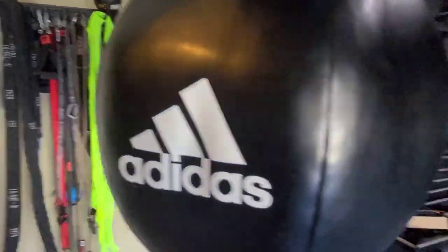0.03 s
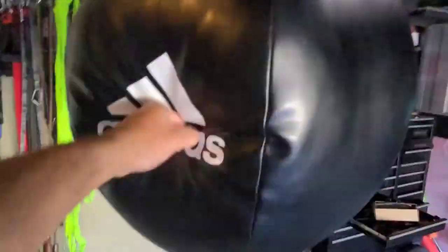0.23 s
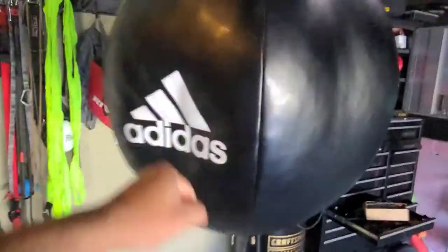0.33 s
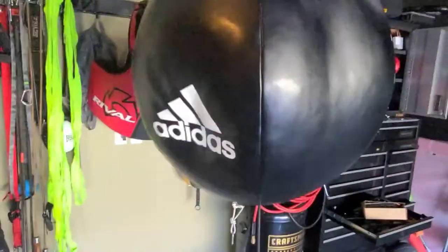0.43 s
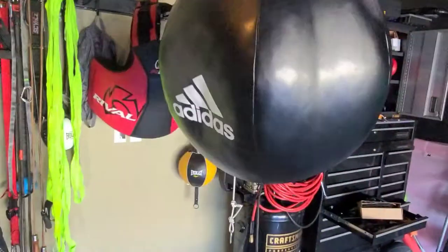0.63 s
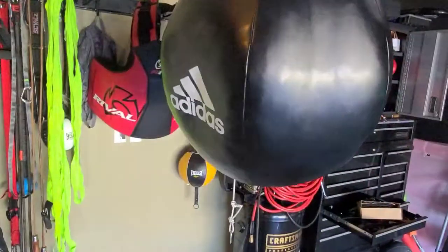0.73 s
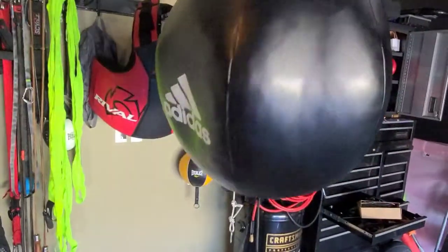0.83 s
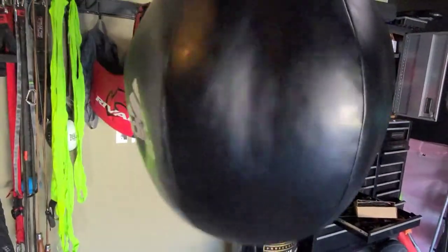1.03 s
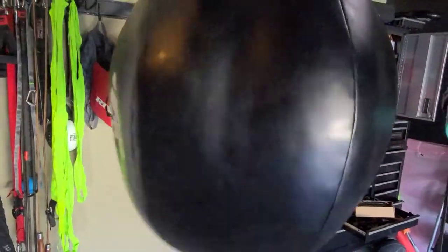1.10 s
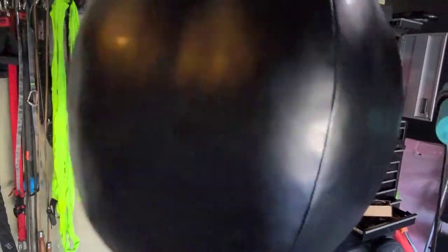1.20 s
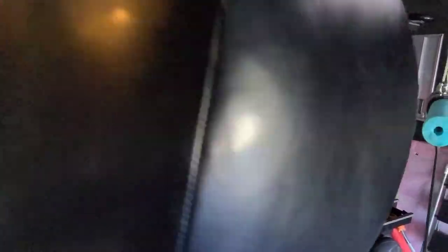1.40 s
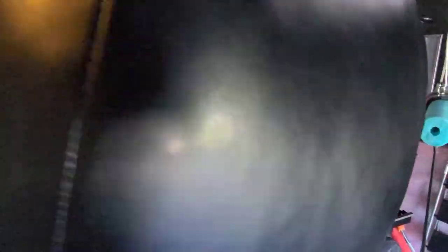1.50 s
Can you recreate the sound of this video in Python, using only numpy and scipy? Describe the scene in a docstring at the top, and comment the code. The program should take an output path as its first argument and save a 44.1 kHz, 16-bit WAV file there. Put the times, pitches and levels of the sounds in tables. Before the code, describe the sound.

Boxing bag takes one hard, booming punch, then a lighter thump with a brief chain rattle

```python
"""Close to a round boxing bag in a quiet garage: low rumble and hiss, and a soft footfall.
A bare fist lands one hard punch: it slaps and knocks the skin, thuds into the filling and sets the bag ringing,
with a deep boom, crinkling skin and a short bright wash off the walls; the hanging chain squeaks as it fades.
Feet shift amid faint hushes of noise, then a lighter punch meets the bag as it swings back: the filling thumps
again, the chain rattles and the feet move. Noise is shaped by spectrum and envelope; ringing is decaying sines."""
import sys
import numpy as np
from scipy import signal
from scipy.fft import rfft, irfft
from scipy.io import wavfile
from scipy.ndimage import uniform_filter1d

SR = 44100
rng = np.random.default_rng(int(sys.argv[2]) if len(sys.argv) > 2 else 0)


def store_wav(level_fs):
    """Save 16-bit WAV to argv[1]."""
    pcm = np.round(np.clip(np.atleast_2d(level_fs), -1, 1) * 32767)
    wavfile.write(sys.argv[1], SR, pcm.T.astype(np.int16))


N = 68355  # length in samples


def undb(db):
    """Decibels to gain."""
    return 10 ** (np.asarray(db) / 20)


def read(table, hz):
    """A table's values, interpolated on a log-frequency axis."""
    f, v = np.array(table, float).T
    return np.interp(np.log(np.maximum(hz, 1)), np.log(f), v)


def bins():
    """Frequencies of a whole-length spectrum in Hz."""
    return np.arange(N // 2 + 1) * SR / N


def since(start):
    """Seconds since a moment, zero before it."""
    return np.maximum(np.arange(N) / SR - start, 0)


def decay(t, t60):
    """Exponential decay that falls by 60 dB in t60 seconds."""
    return np.exp(-np.log(1000) * t / t60)


def swell(peak, width):
    """A smooth bell-shaped rise and fall around a moment."""
    return np.exp(-.5 * ((np.arange(N) / SR - peak) / width) ** 2)


def unit(x):
    """Scale to rms 1."""
    return x / np.sqrt(np.mean(x ** 2))


def wobble(length, span):
    """Two smooth random curves of joint rms 1 that change over the given span of points."""
    size = int(span) + 1
    smooth = uniform_filter1d(rng.standard_normal((2, length)), size)
    return unit(uniform_filter1d(smooth, size))


def colour(x, table):
    """Causal (minimum-phase) filter with the given spectrum and unit energy."""
    cepstrum = irfft(read(table, bins()) * np.log(10) / 20, N)
    # folding the cepstrum forward in time keeps the response from starting early
    cepstrum[1:N // 2] *= 2
    cepstrum[N // 2:] = 0
    response = np.exp(rfft(cepstrum))
    response_rms = np.sqrt(np.mean(abs(response) ** 2))
    return irfft(rfft(x) * response / response_rms, N)


# Stereo width of the garage at the microphones. Each row: frequency in Hz, side minus mid in dB.
ROOM_WIDTH = [(100, -15), (200, -10), (380, -3), (700, 1.5), (1300, 2.5), (2400, 0), (15000, 0)]
# Lean of the garage to one side. Each row: frequency in Hz, left minus right in dB.
ROOM_LEAN = [(200, 0), (1300, -1.5), (3000, -2), (5500, -7), (8000, -1), (15000, -1)]


def diffuse(db):
    """Stereo noise as the room spreads it: bass alike at both microphones, treble far less so."""
    mid, side = rfft(rng.standard_normal((2, N)))
    sign, hz = np.array([[1], [-1]]), bins()  # left, right
    spread = mid + sign * undb(read(ROOM_WIDTH, hz)) * side
    level = undb(db + sign * read(ROOM_LEAN, hz) / 2)
    return unit(irfft(spread * level, N))


# Colour of the empty garage's rumble and hiss. Each row: frequency in Hz, level in dB per Hz.
ROOM_TONE = [(25, -13), (50, -7), (75, 3), (96, 2), (122, -14), (157, -4), (200, -17), (290, -18),
             (360, -16), (470, -24), (800, -28), (1200, -32), (1700, -30), (2300, -37), (3000, -38),
             (6500, -38), (8000, -54), (16000, -58)]
ROOM_TONE_DB = -53  # rms before the surges
SURGE_BELOW_HZ, SURGE_SPREAD_DB, SURGE_S = 450, 2.5, .04


def background():
    """Steady hiss over a low rumble that comes in uneven surges."""
    noise = undb(ROOM_TONE_DB) * diffuse(read(ROOM_TONE, bins()))
    rumble = irfft(rfft(noise) / (1 + (bins() / SURGE_BELOW_HZ) ** 4), N)
    surge = undb(SURGE_SPREAD_DB * wobble(N, SURGE_S * SR)[0])
    return noise + rumble * (surge - 1)


# Footfalls on the garage floor.
# Each row: start in seconds, level in dB, centre in Hz, attack in seconds, decay in seconds.
FOOTFALLS = [(.16, -47, 60, .01, .018), (1.01, -50, 80, .012, .04), (1.3, -39.5, 190, .025, .025),
             (1.47, -53, 35, .03, .1), (1.505, -53, 250, .015, .05)]
FOOTFALL_OCTAVES = .7  # distance from the centre at which the band has dropped 6 dB


def steps():
    """Dull, soft thumps of shifting feet: bands of noise with a short rise and fall."""
    out = 0
    for start, db, hz, attack, decay_s in FOOTFALLS:
        t = since(start)
        octaves = np.log2((bins() + 1) / hz)
        band = -20 * np.log10(1 + (octaves / FOOTFALL_OCTAVES) ** 2)
        dull = -10 * np.log10(1 + (bins() / hz / 2) ** 2)
        envelope = np.minimum(t / attack, 1) * np.exp(-np.maximum(t - attack, 0) / decay_s)
        out = out + undb(db) * diffuse(band + dull) * envelope
    return out


# Faint, brief hushes near the bag. Each row: peak in seconds, level in dB, width in seconds.
HUSHES = [(1.125, -61, .025), (1.305, -49, .022), (1.495, -46.5, .033)]
# Colour of the hushes. Each row: frequency in Hz, level in dB per Hz.
HUSH_COLOUR = [(60, -20), (200, -2), (340, 2), (450, -8), (600, 0), (780, -3), (1100, -21), (1900, -22),
               (2800, -18), (5000, -29), (7000, -32), (9000, -47), (16000, -55)]


def hushes():
    """Faint, brief hushes of noise that swell and fade."""
    envelope = sum(undb(db) * swell(peak, width) for peak, db, width in HUSHES)
    return envelope * diffuse(read(HUSH_COLOUR, bins()))


# Squeaks and rattles of the chain the bag hangs from.
# Each row: peak in seconds, level in dB, width in seconds, spread around the pitch in Hz.
CHAIN_SOUNDS = [(.425, -51, .025, 80), (.528, -54.5, .016, 35), (.65, -72, .06, 30),
                (1.4, -39.5, .009, 450), (1.44, -42.5, .013, 500)]
CHAIN_HZ = 2900


def chain():
    """The hanging chain rings at one pitch: narrow when a link squeaks, broad when the links rattle."""
    out = 0
    for peak, db, width, spread in CHAIN_SOUNDS:
        band = -20 * np.log10(1 + ((bins() - CHAIN_HZ) / spread) ** 2)
        out = out + undb(db) * swell(peak, width) * diffuse(band)
    return out


# Colour of the walls' answer to the hard punch. Each row: frequency in Hz, level in dB per Hz.
HARD_WALLS = [(100, -19), (160, -7), (250, 0), (310, -6), (400, -4), (560, -16), (740, -9), (920, -16),
              (1250, -17), (1600, -13), (2300, -25), (3000, -21), (3700, -21), (4250, -27), (5200, -20),
              (6800, -24), (7700, -32), (12000, -35.5), (15500, -40)]
# Colour of the walls' answer to the lighter punch. Each row: frequency in Hz, level in dB per Hz.
LIGHT_WALLS = [(88, -6), (150, 1), (213, -13), (274, -6), (390, -12), (470, -24), (560, -16), (770, -17),
               (980, -15), (1420, -25), (1800, -20), (2300, -21), (2980, -18), (3800, -26), (4400, -25),
               (5200, -36), (6100, -37), (7700, -57), (15500, -66)]
# How long the garage rings. Each row: frequency in Hz, time to fall by 60 dB in seconds.
GARAGE_T60 = [(100, .52), (250, .76), (700, .65), (2500, .65), (5000, .55), (8000, .46), (15000, .37)]
WASH_DELAY_S, WASH_RISE_S, WASH_LOW_HZ = .002, .002, 190
EARLY_DB, EARLY_S = -15, .015  # slight extra strength at the beginning
FLUTTER_DB, FLUTTER_S = 1.6, .003  # unevenness in time
RIPPLE_DB, RIPPLE_HZ = 2.6, 35  # unevenness across frequency


def wash(start, tone):
    """Dense, uneven reflections off the cluttered walls; each band dies at its own rate."""
    t, hz = since(start + WASH_DELAY_S), bins()
    ripple = RIPPLE_DB * wobble(len(hz), RIPPLE_HZ * N / SR)[0]
    low_cut = -10 * np.log10(1 + (WASH_LOW_HZ / (hz + 1)) ** 6)
    spectrum = rfft(diffuse(read(tone, hz) + ripple + low_cut))
    out = 0
    for centre, t60 in GARAGE_T60:
        # neighbouring bands cross-fade and together add up to the whole spectrum
        share = read([(f, f == centre) for f, _ in GARAGE_T60], hz)
        out = out + irfft(spectrum * share, N) * decay(t, t60)
    flutter = undb(FLUTTER_DB * wobble(N, FLUTTER_S * SR))
    rise = 1 - np.exp(-t / WASH_RISE_S)
    early = 1 + undb(EARLY_DB) * np.exp(-t / EARLY_S)
    return out * flutter * rise * early


BASS_LAG_S, BASS_TILT_DB = .0006, .5  # right side later; tilt is up on the right and down on the left


def place(x):
    """Put the bag between the two microphones: slightly later and louder on the right."""
    late = np.roll(x, int(BASS_LAG_S * SR))
    return np.array([x * undb(-BASS_TILT_DB), late * undb(BASS_TILT_DB)])


# Thumps of the filling after the lighter punch. Each row: peak in seconds, level in dB.
FILLING_THUMPS = [(1.3955, -24.5), (1.4365, -30.5)]
THUMP_HZ, THUMP_WIDTH_S = 142, .007


def rebounds():
    """The filling shifts and thumps again after the lighter punch: short bursts of one low tone."""
    out = 0
    for peak, db in FILLING_THUMPS:
        tone = np.cos(2 * np.pi * THUMP_HZ * (np.arange(N) / SR - peak))
        out = out + undb(db) * swell(peak, THUMP_WIDTH_S) * tone
    return out


# What the bag and the gear around it ring with.
# Each row: frequency in Hz, time to fall by 60 dB in seconds, rise in seconds,
# level in dB after the hard punch, level in dB after the light one.
RINGING = [(29, .45, .01, -27, -65), (86, .45, .005, -18, -41), (119, .38, .03, -20, -30),
           (146, .26, .008, -32, -27), (183, .65, .03, -31, -47), (241, .55, .08, -19, -44),
           (268, .65, .02, -32, -41), (374, .68, .02, -29, -45), (797, .5, .005, -36, -47)]
WAVER_DB, WAVER_S = 2, .025


def ring(start, column):
    """The modes swell, waver and die away; column picks the punch's levels."""
    t = since(start)
    out = 0
    for row in RINGING:
        hz, t60, rise = row[:3]
        level = undb(row[column] + WAVER_DB * wobble(N, WAVER_S * SR)[0])
        envelope = decay(t, t60) * (1 - np.exp(-t / rise))
        out = out + level * envelope * np.sin(2 * np.pi * hz * t)
    return out


BOOM_HZ, BOOM_DB = 60, -16.5
BOOM_LEAD_S, BOOM_ATTACK_S = .0205, .022  # it swells just ahead of the slap
BOOM_HOLD_S, BOOM_T60_S = .16, .85  # the hold counts from the start of the boom


def boom(start):
    """A strong deep boom of bag and room: attack, hold, release."""
    t = since(start - BOOM_LEAD_S)
    attack = np.minimum(t / BOOM_ATTACK_S, 1)
    release = decay(np.maximum(t - BOOM_HOLD_S, 0), BOOM_T60_S)
    return -undb(BOOM_DB) * attack * release * np.sin(2 * np.pi * BOOM_HZ * t)


# Colour of the crinkling skin. Each row: frequency in Hz, level in dB per Hz.
SKIN_CRINKLE = [(1500, -20), (3300, -2), (5500, 0), (6800, -2), (8000, -15), (16000, -22)]
CRINKLE_DB, CLICKS_PER_S, CRINKLE_DECAY_S = -32, 350, .068


def crinkle(start):
    """The dented skin springs back in a fading spray of tiny clicks."""
    clicks = (rng.random((2, N)) < CLICKS_PER_S / SR) * rng.standard_normal((2, N))
    t = since(start)
    grains = unit(np.array([colour(side, SKIN_CRINKLE) for side in clicks]))
    # the whole spray leans as the room does at the colour's third frequency
    lean = undb(np.array([[1], [-1]]) * read(ROOM_LEAN, SKIN_CRINKLE[2][0]) / 2)
    return undb(CRINKLE_DB) * grains * lean * (t > 0) * np.exp(-t / CRINKLE_DECAY_S)


# Knock of the taut skin under the hard punch.
# Each row: frequency in Hz, peak level in dB, rise in seconds, right minus left in dB.
SKIN_KNOCK = [(360, -15.5, .0025, -2), (780, -11, .0016, -1), (1370, -12, .0012, 3), (1750, -16.5, .001, 2),
              (3700, -17, .0005, 4), (5250, -20, .0004, 6)]
KNOCK_DELAY_S, KNOCK_LAG_S = .0003, .0003  # after the punch; right side after the left


def knock(start):
    """The taut skin knocks for a few milliseconds under the knuckles: quick, damped modes."""
    t = since(start + KNOCK_DELAY_S)
    out = 0
    for hz, db, rise, right_db in SKIN_KNOCK:
        envelope = t / rise * np.exp(1 - t / rise)
        left = undb(db) * envelope * np.sin(2 * np.pi * hz * t)
        right = np.roll(left, int(KNOCK_LAG_S * SR))
        out = out + np.array([left * undb(-right_db / 2), right * undb(right_db / 2)])
    return out


def thud(start, length):
    """The filling gives way and pushes back: one heavily damped swing of pressure."""
    u = since(start) / length
    envelope = 2 * u * np.exp(1 - 2 * u)
    return -envelope * np.sin(2 * np.pi * u ** 2 / (u + .5))


# Colour of the hard slap on the skin. Each row: frequency in Hz, level in dB per Hz.
HARD_SKIN = [(100, -12), (260, 5), (400, 4), (560, -11), (900, -3), (1550, 1), (2150, -12), (3650, -6),
             (4400, -11), (5500, -6), (8000, -27), (16000, -29)]
# Colour of the lighter slap on the skin. Each row: frequency in Hz, level in dB per Hz.
LIGHT_SKIN = [(100, -20), (420, -24), (620, 1), (1100, 2), (1800, -6), (2800, -1), (4500, -13), (6300, -22),
              (9000, -43), (16000, -58)]
SLAP_TILT_DB = 1.5  # up on the right, down on the left


def slap(start, length, crease_db, crease_s, lag, tone, count):
    """The hand lands on count spots, unevenly within a few milliseconds, and the skin creases."""
    order = np.arange(count)
    jitter = (order > 0) * rng.uniform(-.5, .5, count)  # the first contact is exactly on time
    moments = start + length * (order + jitter) / count
    hits = np.zeros(N)
    hits[(moments * SR).astype(int)] = rng.choice([-1, 1], count) * np.sqrt(length * SR / count)
    t = since(start)
    crease = undb(crease_db) * rng.standard_normal((2, N)) * (t > 0) * np.exp(-t / crease_s)
    left, right = colour(hits + crease, tone)
    late = np.roll(right, int(lag * SR))
    return np.array([left * undb(-SLAP_TILT_DB), late * undb(SLAP_TILT_DB)])


# The hard punch, close by, and the lighter one as the bag swings back.
# Each row: start in seconds, slap in dB, contact length in seconds, crease in dB relative to the slap,
# crease decay in seconds, thud in dB, thud length in seconds, wash in dB, right-side lag in seconds.
HARD_PUNCH = (.2295, -12, .0036, -11, .0025, -10, .0055, -20.8, .0003)
LIGHT_PUNCH = (1.3624, -21.5, .0012, -1, .0035, -34, .007, -30.4, .00003)


def punch(row, slap_tone, wash_tone, count):
    """Slap, thud and the garage's answer; count is the number of spots where the hand lands."""
    start, slap_db, contact, crease_db, crease_s, thud_db, thud_s, wash_db, lag = row
    skin = undb(slap_db) * slap(start, contact, crease_db, crease_s, lag, slap_tone, count)
    filling = undb(thud_db) * thud(start, thud_s)
    walls = undb(wash_db) * wash(start, wash_tone)
    return skin + filling + walls


def scene():
    """The quiet garage, footwork, faint hushes, the chain and two punches."""
    surroundings = background() + steps() + hushes() + chain()
    hard_start, light_start = HARD_PUNCH[0], LIGHT_PUNCH[0]
    hard = punch(HARD_PUNCH, HARD_SKIN, HARD_WALLS, count=14)
    hard = hard + knock(hard_start) + crinkle(hard_start)
    hard = hard + place(ring(hard_start, column=-2) + boom(hard_start))
    light = punch(LIGHT_PUNCH, LIGHT_SKIN, LIGHT_WALLS, count=1)
    light = light + place(ring(light_start, column=-1) + rebounds())
    return surroundings + hard + light


PEAK_LIMIT, TOP_HZ = .92, 16000


def record(dry):
    """The microphone rounds the highest peaks and the top is cut."""
    rounded = dry / (1 + (dry / PEAK_LIMIT) ** 6) ** (1 / 6)
    top_cut = signal.ellip(8, .2, 70, TOP_HZ, fs=SR, output="sos")
    return signal.sosfilt(top_cut, rounded)


dry = scene()
out = record(dry)
store_wav(out)
```